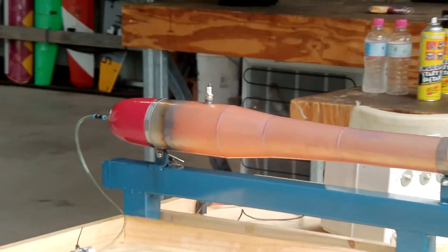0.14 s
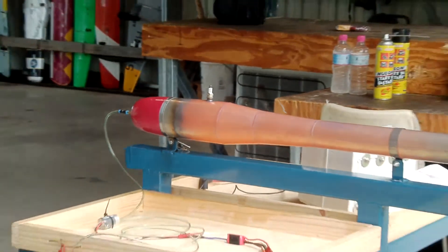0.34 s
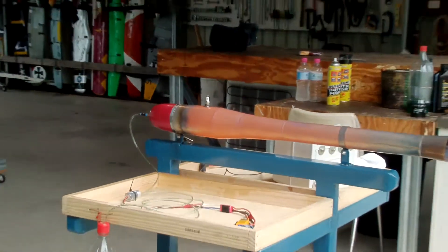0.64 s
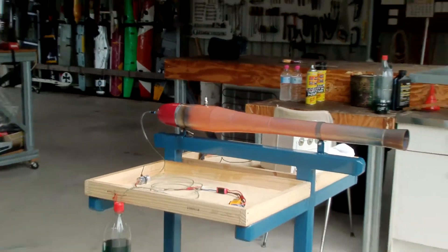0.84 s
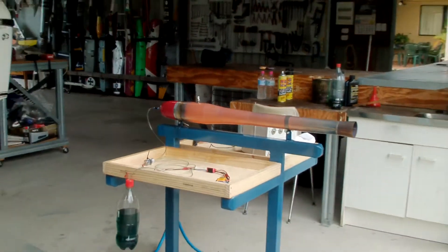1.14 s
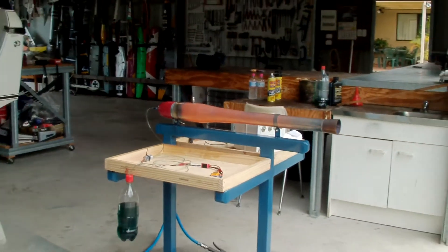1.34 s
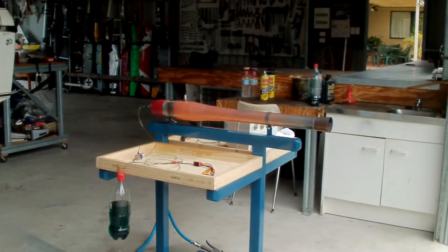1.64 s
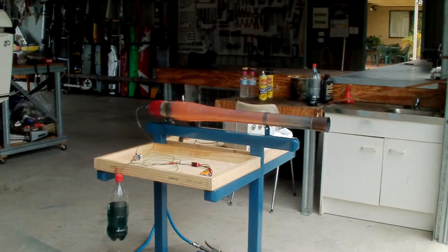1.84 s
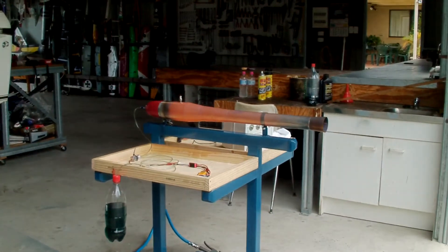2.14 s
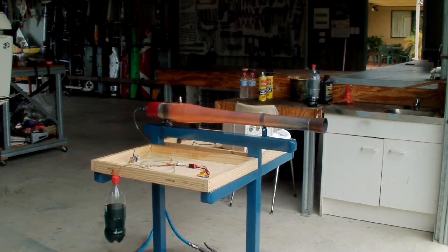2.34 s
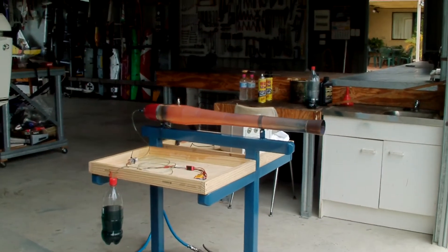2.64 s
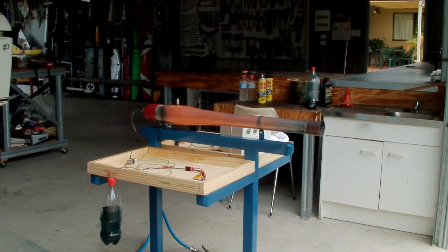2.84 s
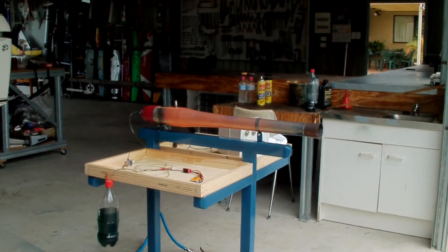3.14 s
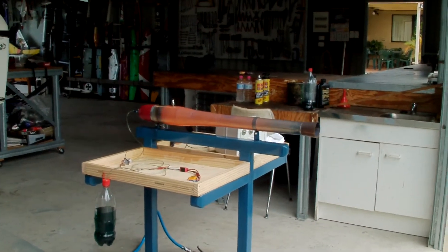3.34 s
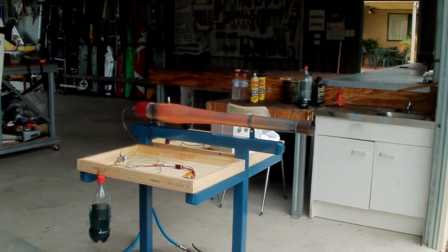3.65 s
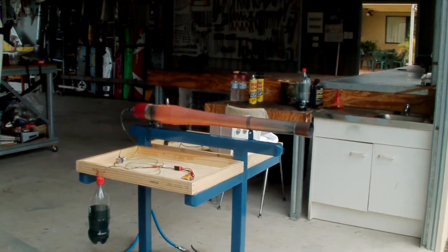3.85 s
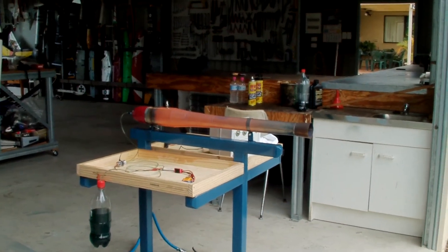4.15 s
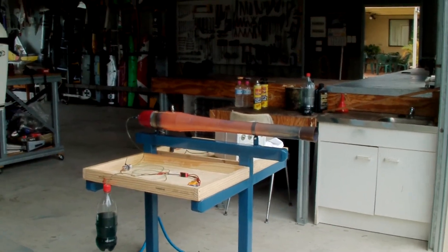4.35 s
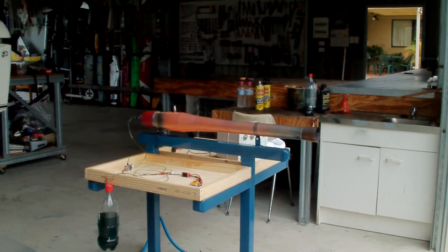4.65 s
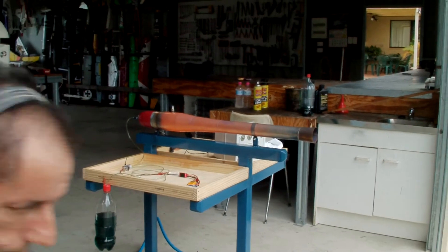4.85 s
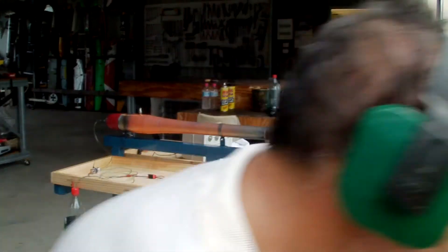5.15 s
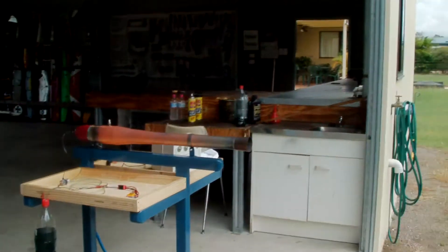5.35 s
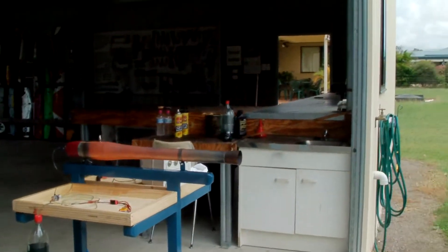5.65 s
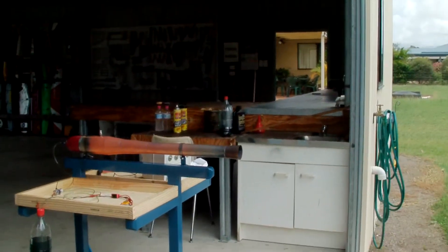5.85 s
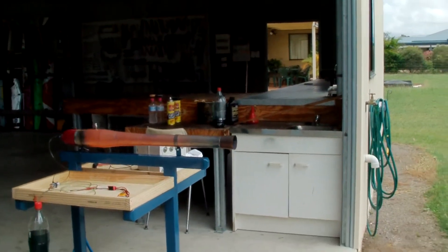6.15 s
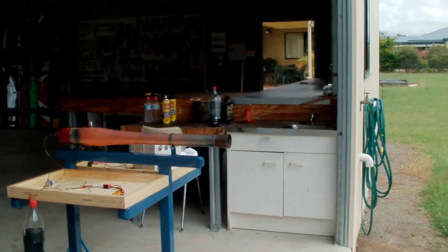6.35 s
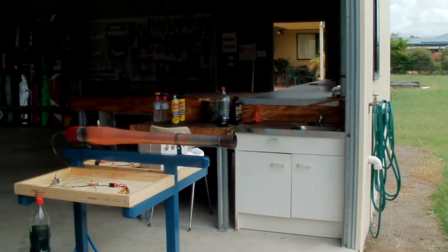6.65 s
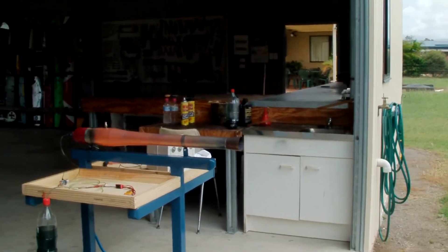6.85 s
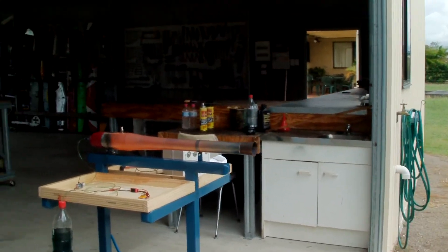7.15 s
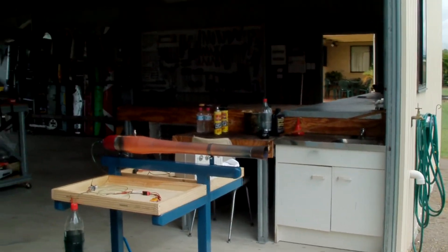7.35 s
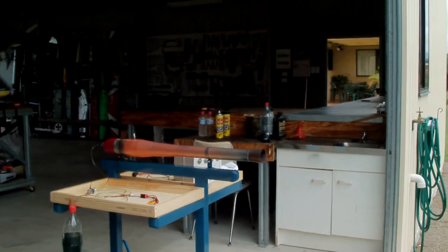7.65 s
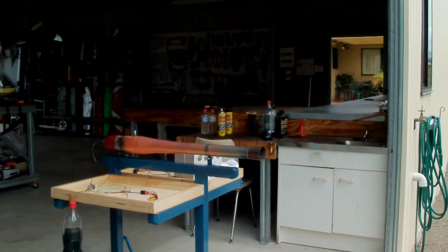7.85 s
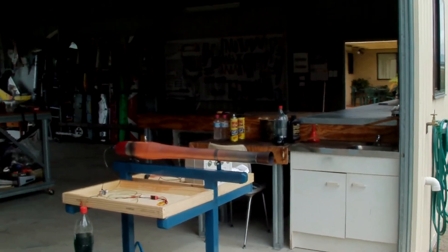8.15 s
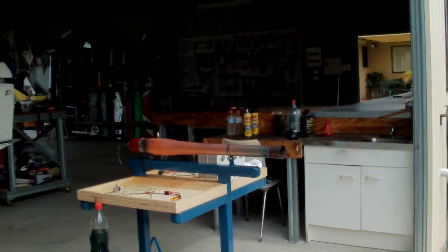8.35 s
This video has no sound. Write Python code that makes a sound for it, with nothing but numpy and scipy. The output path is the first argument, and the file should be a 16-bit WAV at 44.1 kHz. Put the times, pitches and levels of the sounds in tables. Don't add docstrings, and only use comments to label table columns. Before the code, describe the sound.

Very loud, steady pulse jet: a raspy mid-pitched buzz with dense rushing exhaust, flickering briefly as someone passes close by.

```python
import sys
import numpy as np
from scipy import signal
from scipy.fft import rfft, irfft, next_fast_len
from scipy.io import wavfile
from scipy.ndimage import uniform_filter1d, map_coordinates

SR = 44100
rng = np.random.default_rng(int(sys.argv[2]) if len(sys.argv) > 2 else 0)


def convert_level_to_amplitude(level_db):
    exponent = np.asarray(level_db, float) / 20
    return 10 ** exponent


def unload_wav(signal):
    wavfile.write(
        sys.argv[1],
        SR,
        np.round(np.clip(np.atleast_2d(signal).T, -1, 1) * 32767).astype(np.int16),
    )


N = 374849

# time [s], roar level [dB], swing to the doorway [0-1],
# extra path off the bench [ms], extra path off the floor [ms].
CAMERA_PATH = [(0, -11, 0, 1.22, 2.9), (.4, -13.5, 0, 1.26, 2.84), (.85, -11, 0.02, 1.3, 2.69),
               (1.5, -13.5, 0.18, 1.2, 2.74), (3, -13, 0, 1.34, 2.98), (4.5, -13.5, 0.05, 1.34, 2.81),
               (5.5, -13, 0.16, 1.17, 2.89), (5.85, -14, 0.9, 1.28, 2.73), (7, -14.5, 0.84, 1.1, 2.87),
               (7.6, -17, 0.86, 1.3, 2.64), (8.5, -16, 0.8, 1.28, 3.1)]
# centre [s], half length [s], change of roar [dB].
PASSER_DB = [
    (4.99, 0.035, 2),
    (5.07, 0.062, -1),
    (5.145, 0.033, 2.5),
    (5.26, 0.1, -3),
]


def unit(x):
    return x / np.sqrt(np.mean(x ** 2) + 1e-20)


def curves(rows):
    s, *cols = np.transpose(rows)
    return [np.interp(np.arange(N) / SR, s, c) for c in cols]


def wobble(rate):
    knots = rng.standard_normal(int(N * rate / SR) + 4)
    return map_coordinates(knots, [np.arange(N) * rate / SR])


def bumps(rows):
    t = np.arange(N) / SR
    return sum(db * np.exp(-((t - s) / half_s) ** 2) for s, half_s, db in rows)


def coloured(x, points):
    m = next_fast_len(N + 8192)
    hz, db = np.transpose(points)
    gain_db = np.interp(np.log(np.fft.rfftfreq(m, 1 / SR) + 1), np.log(hz + 1), db)
    return unit(irfft(rfft(x, m) * convert_level_to_amplitude(gain_db), m)[:N])


def later(x, ms):
    return map_coordinates(x, [np.arange(N) - ms * SR / 1000], mode="nearest")


def hiss_and_rumble(shape):
    # frequency [Hz], density [dB per Hz].
    hiss_db = [(20, 5.5), (300, -4), (2000, 4.5), (9000, 0), (16000, 2)]
    # frequency [Hz], density [dB per Hz].
    rumble_db = [(15, -3), (70, -7), (130, -8), (250, -26), (500, -90)]
    hiss_level = convert_level_to_amplitude(-39 + 0.76 * wobble(40))
    hiss = hiss_level * np.array([coloured(side, hiss_db) for side in rng.standard_normal(shape)])
    rumble = convert_level_to_amplitude(-59.0 + 3.6 * wobble(14)) * coloured(rng.standard_normal(N), rumble_db)
    return hiss + rumble


def hollows(roar, swing):
    # resonance [Hz], width [Hz].
    recess_hz = [(1430, 570), (2240, 120), (2470, 59)]
    # level [dB], gain once swung to the doorway [dB].
    recess_db = [(-24, 16.5), (-26.5, 15.5), (-26, -7)]
    # centre [s], half length [s], gain [dB].
    openings = [
        [(3.6, .9, -3), (5.13, .045, 14)],
        [(4.2, 0.5, 13), (6.6, 0.82, 7)],
        [(2.3, .3, 17), (5.22, .05, 22.5), (5.36, 0.064, 25)],
    ]
    m = next_fast_len(N + 8192)
    f, spectrum = np.fft.rfftfreq(m, 1 / SR), rfft(roar, m)
    total = 0
    for (hz, width_hz), (db, swung_db), opening in zip(recess_hz, recess_db, openings):
        bandpass = 1j * f * width_hz / (hz * hz - f * f + 1j * f * width_hz)
        ring = unit(irfft(spectrum * bandpass, m)[:N])
        total = total + convert_level_to_amplitude(db + swung_db * swing + bumps(opening)) * ring
    return total


def flat_faces(x, swing, bench_ms, floor_ms):
    bench = convert_level_to_amplitude(-18 + 7 * swing) * later(x, bench_ms)
    floor = convert_level_to_amplitude(-12) * later(x, floor_ms)
    cupboard = convert_level_to_amplitude(-21) * later(x, 0.91 + 0.64 * swing)
    return bench + floor + cupboard


def blast(turns, rise, fall, scatter_db):
    size = convert_level_to_amplitude(scatter_db * rng.standard_normal(int(turns[-1]) + 2))
    part, number = turns % 1, turns.astype(int)
    return size[number] * (1 - np.exp(-part / rise)) * np.exp(-part / fall)


def jet(turns, spectrum, rise, fall, scatter_db, bench_db, floor_db, shed_db):
    bench_ms, floor_ms = curves(CAMERA_PATH)[-2:]
    puff = blast(turns, rise, fall, scatter_db)
    off_floor = convert_level_to_amplitude(floor_db) * later(puff, floor_ms)
    off_bench = convert_level_to_amplitude(bench_db) * later(puff + off_floor, bench_ms)
    puffs = np.sum([puff, off_floor, off_bench] * rng.standard_normal((3, N)), axis=0)
    wash = convert_level_to_amplitude(shed_db + 0.29 * wobble(20)) * rng.standard_normal(N)
    return coloured(unit(puffs) + wash, spectrum)


def exhaust_crackle(turns, swing):
    # frequency [Hz], density [dB per Hz].
    crackle_db = [(2060, 6), (3500, 0), (12300, -26), (15600, -33)]
    noise = jet(turns, [(2500, -62)] + list(crackle_db), rise=0.037, fall=0.1, scatter_db=2.0,
                bench_db=-5, floor_db=.8, shed_db=-7.5)
    shade_db = 0.53 * bumps(PASSER_DB[-1:])
    return convert_level_to_amplitude(-5.5 + 1.9 * swing + shade_db + 1.1 * wobble(5)) * noise


def exhaust_roar(turns):
    # frequency [Hz], density [dB per Hz].
    roar_spectrum_db = [(12, -71), (20, -23), (91, -47), (262, -25), (311, -19), (370, -23), (484, -11.5),
                        (547, -11.5), (634, -14), (716, -11), (810, -9), (872, -6), (1420, -5), (2270, -7),
                        (7000, -34.5), (9100, -96), (15400, -120)]
    return jet(turns, roar_spectrum_db, rise=0.052, fall=.12, scatter_db=2.5,
               bench_db=-6.0, floor_db=0.5, shed_db=-5)


def drone(turns):
    # order, level [dB rms], slow drift [dB].
    strong_orders = [(5, -17, 0.24), (4, -23.5, 0.8), (3, -37.5, 1.5), (2, -39, .7)]
    # order, level [dB rms], gain once swung to the doorway [dB].
    steady_orders = [(1, -58.5, -3), (6, -31, -9), (7, -29.5, -0.5), (8, -27.5, -5.5), (11, -36, 1),
                     (12, -40.5, 9), (13, -40, 2), (14, -35, 6), (15, -37, 2.5), (16, -52, 2),
                     (1.5, -51, -3.5), (2.5, -52, -3), (3.5, -53, -9)]
    # centre [s], half length [s],
    # gain [dB].
    passer_lift = [(5.35, .25, 4.5)]
    pipe_hz, pipe_width_hz = 760, 200
    roar_db, swing = curves(CAMERA_PATH)[:2]
    lift_db = bumps(passer_lift)
    standing_from_s, standing_db_per_s = 7.3, 7.5
    standing_db = standing_db_per_s * np.clip(np.arange(N) / SR - standing_from_s, 0, None)
    levels = []
    for order, db, drift_db in strong_orders:
        third_db = (standing_db + lift_db) * (round(order) == 3)
        levels.append((order, db + drift_db * wobble(4) + third_db))
    levels += [(order, db + swung_db * swing) for order, db, swung_db in steady_orders]

    rate_hz = turns[-1] * SR / N
    early = 0.0094 * wobble(45)
    waves = []
    for order, db in levels:
        order = round(2 * order) / 2
        hz = order * rate_hz
        lag = np.angle(1j / (pipe_hz ** 2 - hz ** 2 + 1j * hz * pipe_width_hz))
        lag += np.pi * (order > 5.5)
        sway_db = 0.14 * order * wobble(23)
        phase = 2 * np.pi * order * (turns + early) + lag
        waves.append(np.sqrt(2) * convert_level_to_amplitude(db + sway_db) * np.exp(1j * phase))
    ring = waves[0] + waves[1]
    steep_db = 7.5 + 0.75 * (roar_db + 13.5) + lift_db
    return np.real(sum(waves) - convert_level_to_amplitude(steep_db - 6) * ring ** 2)


def scene():
    # time [s], order 5 of the firing rate [Hz].
    fifth_order_hz = [(0, 806), (.4, 804.9), (1.2, 804.2), (1.5, 805), (2.5, 805.3), (3.3, 802.2),
                      (4.7, 804.5), (5.5, 803.6), (5.9, 802), (6.8, 803.9), (7.5, 801), (8.5, 801)]
    turns = np.cumsum(curves(fifth_order_hz)[0] / 5) / SR
    roar_db, swing, bench_ms, floor_ms = curves(CAMERA_PATH)
    level = convert_level_to_amplitude(roar_db + bumps(PASSER_DB) - 1.13 + 0.43 * wobble(12))
    roar = level * exhaust_roar(turns)
    crackle = level * exhaust_crackle(turns, swing)
    returned = roar + convert_level_to_amplitude(-3) * crackle
    mirrored = flat_faces(returned, swing, bench_ms, floor_ms)
    ringing = level * hollows(roar, swing)
    ring_lag = .03
    mono = convert_level_to_amplitude(2.0) * drone(turns - ring_lag) + roar + crackle + mirrored + ringing
    return np.array([mono, mono])


def microphone(dry):
    power = np.abs(uniform_filter1d(dry ** 2, round(0.0207 * SR), axis=1)) / np.mean(dry ** 2)
    even = dry * (power + 0.0011) ** -.15
    top = np.where(even > 0, .7, 1.4)
    squeezed = even / (1 + np.abs(even / top) ** 2.2) ** (1 / 2.2)
    thin = signal.sosfilt(signal.butter(2, 280, "high", fs=SR, output="sos"), squeezed)
    return thin / (1 + np.abs(thin / 1.08) ** 6) ** (1 / 6)


def low_pass(x):
    return signal.sosfilt(signal.butter(12, 15750, fs=SR, output="sos"), x)


def record(dry):
    balance = convert_level_to_amplitude([[.06], [-.02]])
    return low_pass(microphone(dry) * balance + hiss_and_rumble(dry.shape))


dry = scene()
out = record(dry)
unload_wav(out)
```